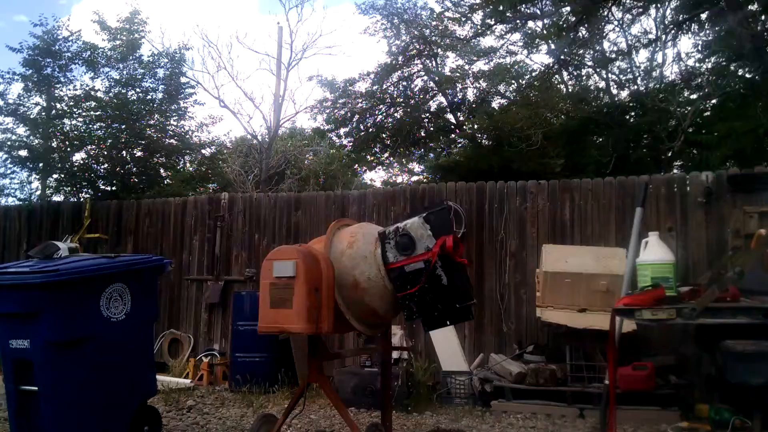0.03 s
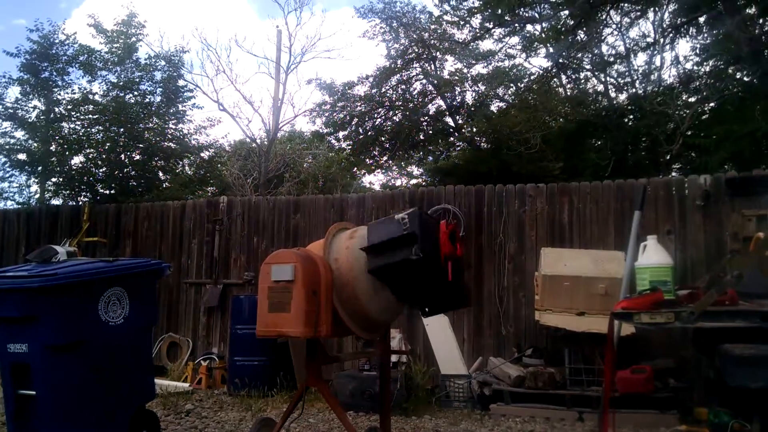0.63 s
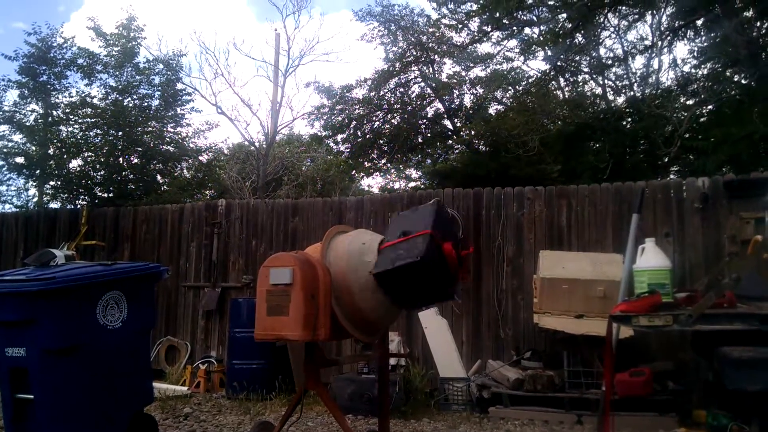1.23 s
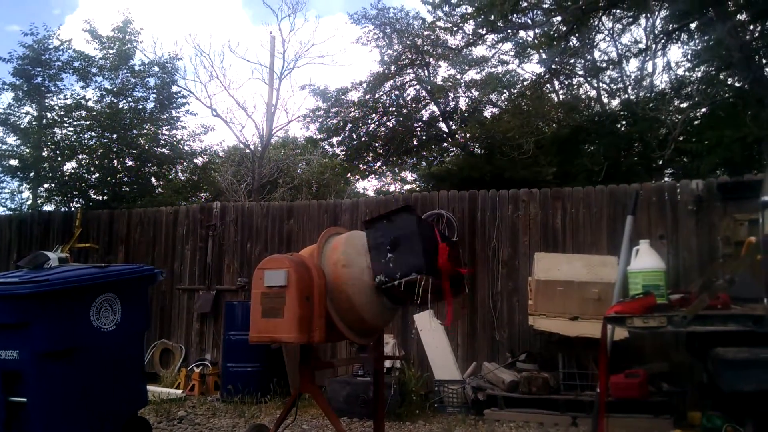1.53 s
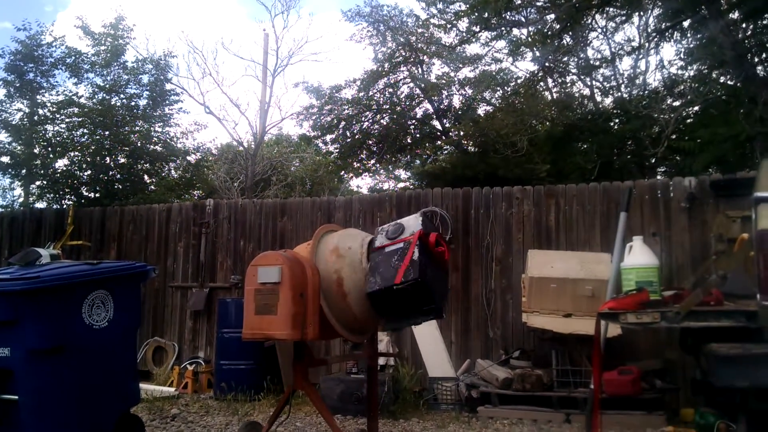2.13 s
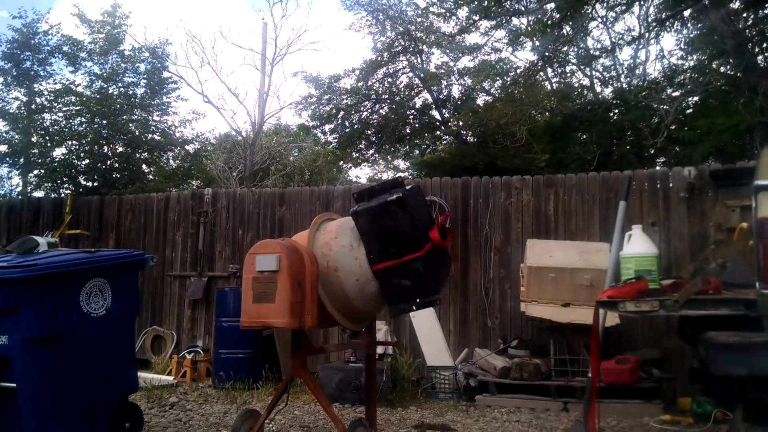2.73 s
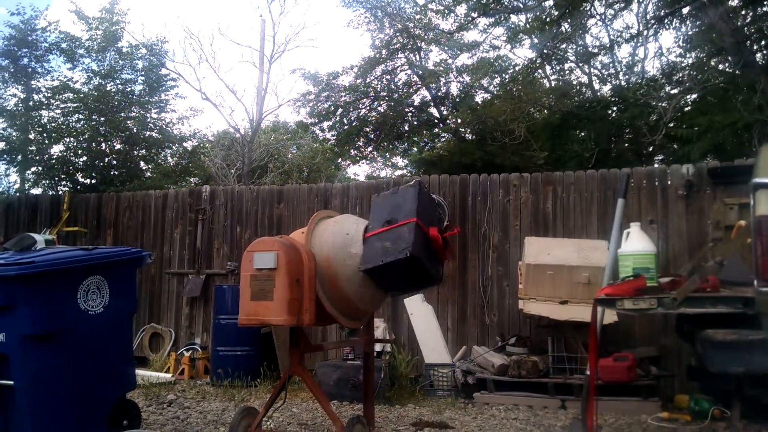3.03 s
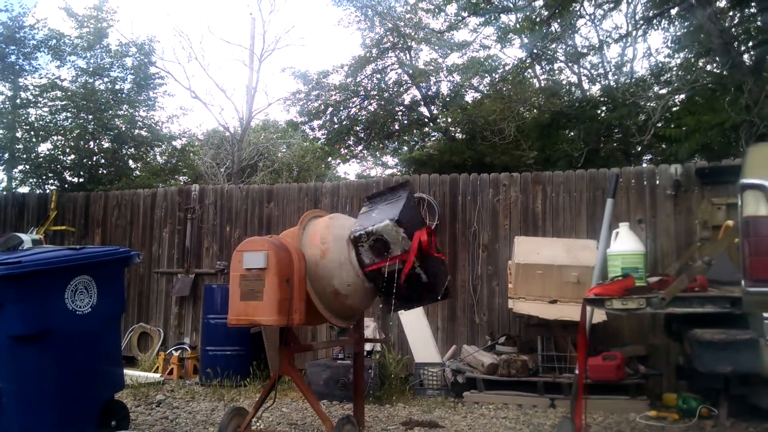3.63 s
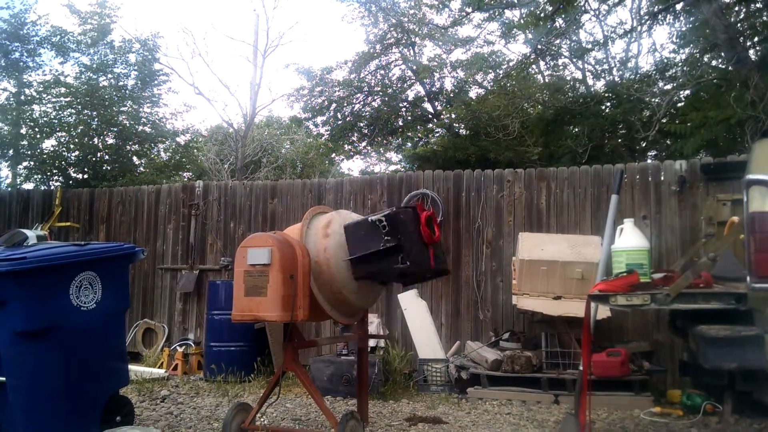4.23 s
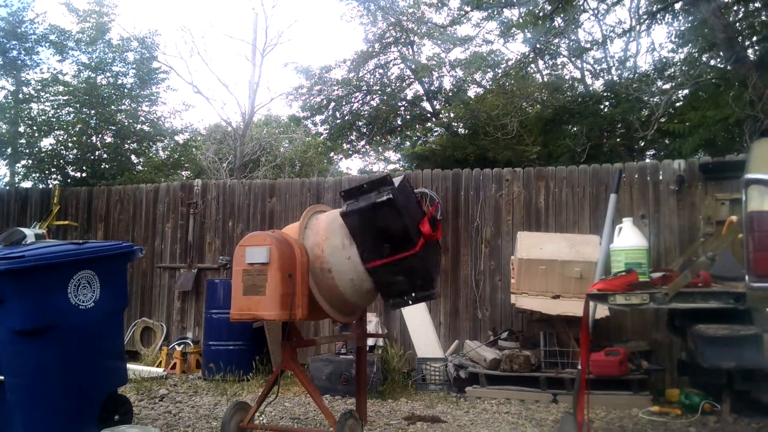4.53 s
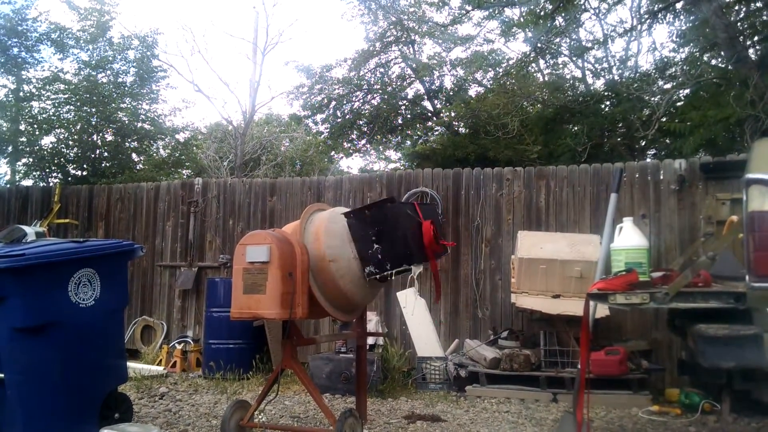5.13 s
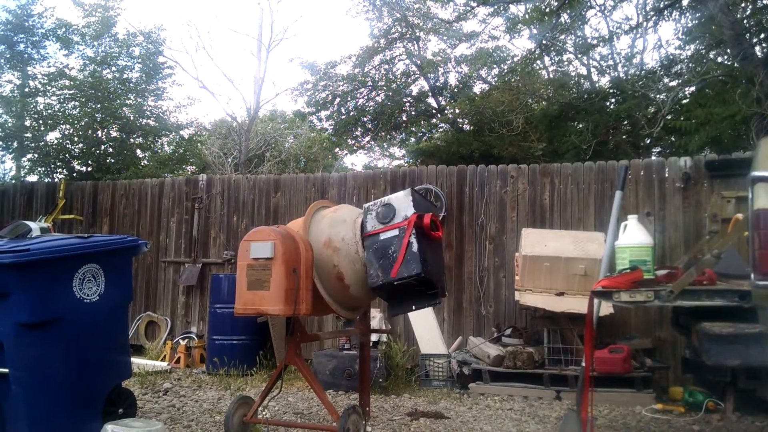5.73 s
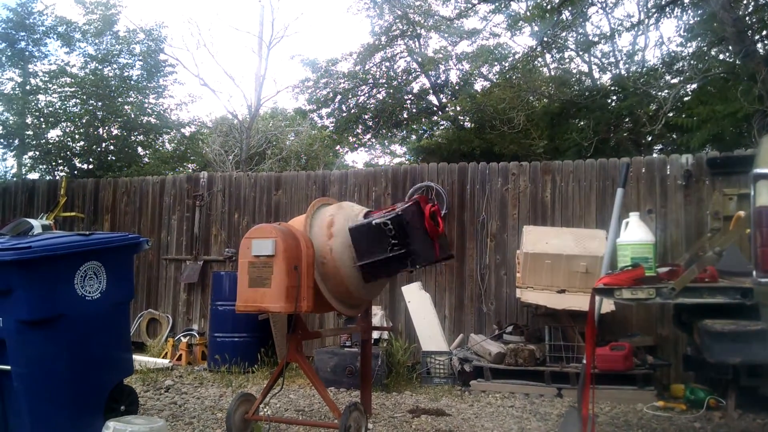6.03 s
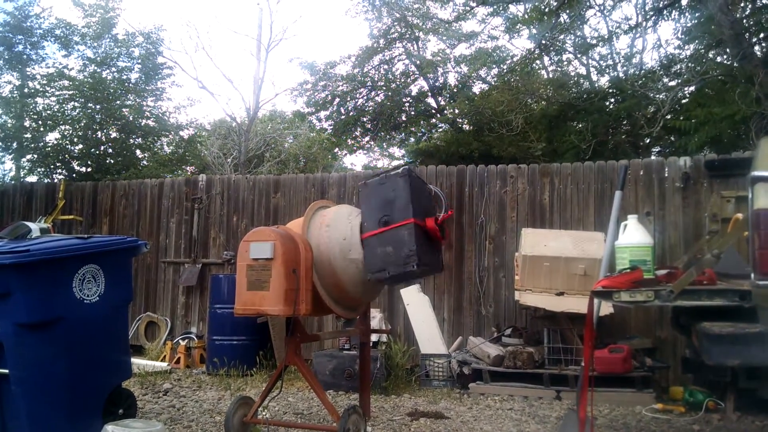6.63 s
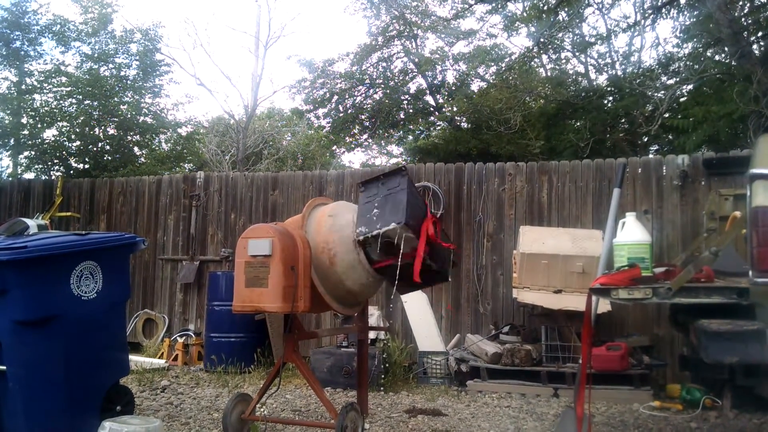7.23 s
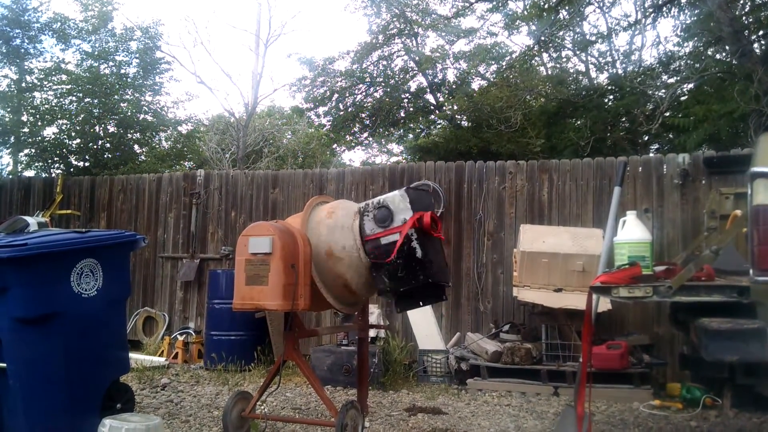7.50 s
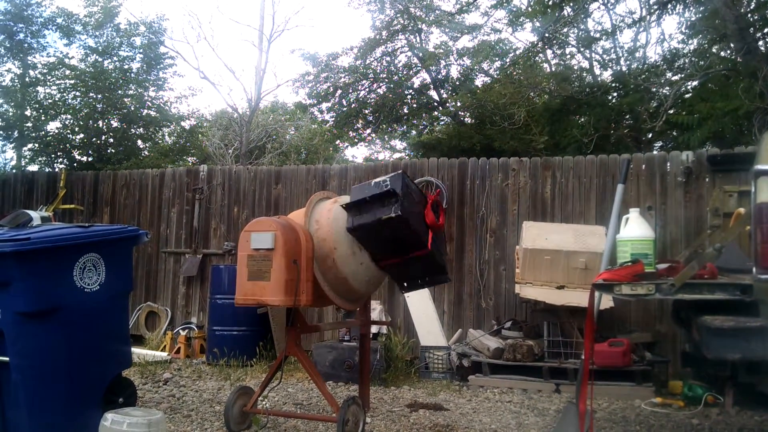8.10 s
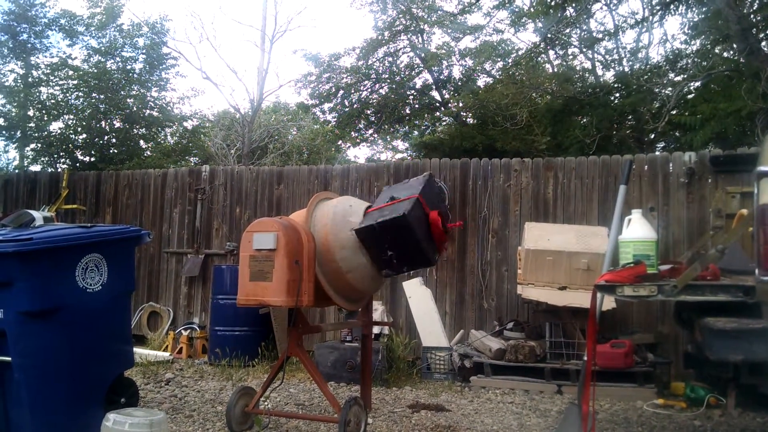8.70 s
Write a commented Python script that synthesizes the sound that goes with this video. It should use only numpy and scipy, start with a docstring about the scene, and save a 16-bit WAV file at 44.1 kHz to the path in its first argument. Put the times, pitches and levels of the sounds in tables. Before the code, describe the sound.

From about 0.3 seconds, loose hard pieces tumble inside a tank turning on a cement mixer. Roughly every 0.9 seconds the load pours across the wall in a bright, sizzling rattle with a gritty scrape, then rolls into a corner and drums hollowly on the tank. The pours come near 1.2, 2.1, 3, 3.9, 5, 5.7, 6.7, 7.6 and 8.6 seconds. Single pieces clink and ping around them, and heavier ones knock and briefly ring the tank. A faint, low motor hum and rumble continue underneath. At about 4.7 seconds one sharp, loud microphone pop ducks everything for about half a second. A hard clack stands out near 5.9 seconds, the drumming grows stronger from about 7.5, and the heaviest knock lands at 8.5. The sound is in stereo, outdoors in a back yard, with a short, faint echo from the fence.

```python
"""Loose hard pieces tumble in a tank strapped to the drum of a cement mixer in a back yard.
Twice a turn the load pours across a wall with a bright rattle, then rolls into a corner and drums
on the tank. Single pieces clink; heavy ones knock and ring the tank. The motor hums underneath
and the fence returns a short echo. A two-port microphone picks it up, with one sharp pop
that ducks its limiter for about half a second."""
import sys
import numpy as np
from scipy import signal
from scipy.fft import rfft, irfft
from scipy.io import wavfile
from scipy.ndimage import uniform_filter1d

SR = 44100
rng = np.random.default_rng(int(sys.argv[2]) if len(sys.argv) > 2 else 0)


def wav_record(signal):
    """Record a signal, one row per channel, as 16-bit PCM in the file named by sys.argv[1]."""
    frames = np.transpose(np.atleast_2d(signal))
    bounded = np.clip(frames, -1, 1)
    # unit amplitude maps onto the largest positive 16-bit level
    quanta = np.round(bounded * 32767).astype(np.int16)
    wavfile.write(sys.argv[1], SR, quanta)


N = 386316
DRUMMING, CLATTER, BOOM = 1, 2, 3  # columns of HEAP_CYCLE and HEAP_ACCENTS


def tumbling(drumming_hz=345, clatter_hz=790, boom_hz=(62, 285), spots=64):
    """The rolling heap drums on the walls; its hard edges clatter and its weight booms the tank."""
    hits = hail(per_s=800, spread_db=1.8, clump_db=1.5, clump_hz=32.8)
    spot = (spots * np.arange(N) / N + 2 * rng.random(N)).astype(int)
    blows = strike(hits, [tank_ring() for _ in range(spots)], spot)
    upper = signal.sosfiltfilt(signal.butter(8, clatter_hz, "high", fs=SR, output="sos"), blows)
    drumming = heap_level(DRUMMING) * steady(band(blows - upper, drumming_hz, "high"))
    clatter = heap_level(CLATTER) * steady(upper)
    boom = heap_level(BOOM) * steady(band(blows, boom_hz, "band"))
    return drumming + clatter + boom


# heap over one turn: time_s, drumming_db, clatter_db, boom_db
HEAP_CYCLE = [(0.05, -39, -40.5, -42.5), (.18, -36, -37, -39.5), (.26, -38, -42, -47.5),
              (.36, -33, -36.5, -41), (.46, -31.5, -33, -39.5), (.55, -33.5, -38, -37),
              (.61, -31, -32, -36.5), (.74, -35, -42.5, -37.5), (.82, -30, -32.5, -35),
              (.89, -28.5, -29, -33.5), (.96, -26.5, -26, -30.5), (1.05, -30.5, -35, -31),
              (1.13, -27.5, -32, -32), (1.19, -28, -32, -30.5), (1.29, -32, -36.5, -36.5),
              (1.38, -27.5, -29, -34), (1.46, -29, -32, -33), (1.6, -26.5, -27.5, -33),
              (1.73, -31.5, -31.5, -35), (1.82, -37, -39.5, -36.5)]
# force of the roll, per turn: offset_db
TURN_OFFSETS = [-1.5, -2.5, -2.5, -3, 0.06]
# brief swells and dips: centre_s, drumming_offset_db, clatter_offset_db, boom_offset_db
HEAP_ACCENTS = [(.92, 3, 2, 5), (1.185, 4, 1, 3), (1.79, 3, 6, 4), (2.79, -2, -0.5, 2),
                (3.221, -1, 5.5, -1), (3.45, 2.5, 2.5, 3), (3.625, 2, 4.5, 1.5), (3.81, 6.5, 5.5, 7),
                (4.025, 2, 4, 4), (4.3, 3, -0.5, 1), (4.465, 6, 0, 1.5), (4.69, 4, 1.5, 1.5),
                (5.045, 2.5, 6, 2), (5.78, 8, 6, -4), (6.275, 4, 5.5, 0), (6.37, 2, 3.5, 3),
                (6.765, 2.5, 6, 1.5), (7.08, 1, 2.5, 0), (7.424, 5.5, 4.5, 5), (7.56, -2, 4, -3),
                (7.65, 9.5, 11, 10), (7.88, 8, 4, 2), (8.035, 2.5, 0, 1), (8.245, 5, 3.5, 8),
                (8.42, 0, 0.5, 1)]

def heap_level(column, turn_s=1.85, accent_half_width_s=0.041):
    """Level of the rolling heap: one cycle a turn, varied by turn and by brief accents."""
    t, cycle = np.arange(0, N, 128) / SR, np.array(HEAP_CYCLE)
    db = np.interp(t, cycle[:, 0], cycle[:, column], period=turn_s)
    db += np.interp(t / turn_s, np.arange(len(TURN_OFFSETS)) + .5, TURN_OFFSETS)
    db += sum(row[column] * np.exp(-((t - row[0]) / accent_half_width_s) ** 2) for row in HEAP_ACCENTS)
    return np.interp(np.arange(N) / SR, t, gain_of(db))


# tank modes: pitch_hz, width_hz, level_db
TANK_MODES = [(72, 7.5, -10), (142.7, 5.6, -8.5), (187.8, 9.3, 0.5), (210.9, 10.6, -0.5), (240.7, 15.2, -3),
              (395.7, 29, -3), (474, 53, -3.5), (554.6, 17.3, 0.5), (601, 28, 7), (645.5, 36, -1),
              (691.7, 20.5, 2), (772, 24, -6.5), (871.4, 26, 4), (927, 30, -4.5), (1027.5, 33, 0),
              (1288, 18, -6), (1392.4, 37, 0), (1453, 53, -5), (1562, 44, -12)]
# dense, fast-dying ring between the modes: freq_hz, level_db
WALL_SPECTRUM = [(30, -53), (100, -24), (180, -0.5), (300, -15.5), (550, 7.5), (950, -1.5), (1200, -5.5),
                 (1500, -5), (2000, -3.5), (2600, -9.5), (4000, -15), (9000, -62.5)]

def tank_ring(wall_db=-2.5, wall_t60_s=0.047, detune=.017, damping_spread=.3, size=6144):
    """One blow: each spot excites the modes differently; the load detunes and damps them."""
    t = np.arange(size) / SR
    hz, width_hz, db = np.transpose(TANK_MODES)[:, :, None]
    weight = rng.choice([-1, 1], (2, len(hz))) * rng.uniform(0.42, 1.8, (2, len(hz)))
    hz = hz * (1 + detune * rng.standard_normal(hz.shape))
    damped_hz = width_hz * np.exp(damping_spread * rng.standard_normal(hz.shape))
    envelopes = gain_of(db) * np.sqrt(width_hz * damped_hz) * np.exp(-np.pi * damped_hz * t)
    modes = weight @ (envelopes * np.sin(2 * np.pi * hz * t))
    wall = colour(burst(decay(wall_t60_s, size)), WALL_SPECTRUM)
    return unit_rms(modes) + gain_of(wall_db) * unit_rms(wall)


# heavy blows: start_s, clack_db, clack_t60_s, ring_db
HEAVY_BLOWS = [(0.603, -23, .02, -28), (0.886, -19, .04, -17), (1.365, -24, .04, -12),
               (1.595, -23, 0.036, -15), (1.946, -23, 0.051, -27), (2.241, -23, .03, -21),
               (2.645, -26, 0.022, -27), (2.809, -23, .03, -22), (3.431, -20, .03, -23),
               (3.468, -18, .03, -20), (3.624, -19, .02, -25), (3.763, -24, .03, -24),
               (3.869, -12, .018, -22), (4.117, -19, .04, -17.5), (4.463, -36, .04, -19),
               (4.662, -18, .03, -21), (5.870, -4.5, 0.024, -19), (6.333, -22, .04, -19.5),
               (6.412, -19, .03, -20), (7.098, -18, 0.021, -24), (7.523, -22, 0.026, -27),
               (7.848, -17, .04, -14), (8.008, -16, 0.021, -20.5), (8.205, -22, .04, -17),
               (8.235, -9.5, 0.044, -16), (8.512, 0, .06, -8)]
# hard contact on a wall: freq_hz, level_db
CLACK_SPECTRUM = [(60, -17), (250, -10), (420, 5.5), (600, 5.5), (900, 4), (1150, 1), (1400, 4.5),
                  (1620, 0), (1850, -11), (2300, -14), (3500, -12), (8000, -34)]

def knocking(ring_trim_db=-1):
    """Heavy pieces strike a wall with a hollow clack and ring the tank."""
    out = np.zeros((2, N))
    for start_s, clack_db, t60_s, ring_db in HEAVY_BLOWS:
        clack, ring = colour(burst(decay(t60_s)), CLACK_SPECTRUM), tank_ring()
        add(out, start_s, gain_of(clack_db) * clack / abs(clack).max(1, keepdims=True))
        add(out, start_s, gain_of(ring_db + ring_trim_db) * ring / abs(ring).max())
    return out


# pieces scraping the wall: freq_hz, level_db
SCRAPE_SPECTRUM = [(200, -35), (900, 2), (1500, -1.5), (1900, -9), (2400, -11), (2800, -2), (3300, 2.5),
                   (4000, -1), (4700, -5.5), (5500, -4), (6600, -5), (7800, -2.5), (12000, -4.5)]

def sliding(flow, grinding, rattle_db=1.5, scrape_db=2.0, count=48):
    """Pieces pour over each other in bright ticks and scrape along the wall."""
    hits = hail(per_s=1000, spread_db=3.2, clump_db=2.4, clump_hz=50)
    pieces = [tick(t60_s=.012, uneven_db=5.5, crack_db=-2) for _ in range(count)]
    ticks = steady(strike(hits, pieces, rng.integers(0, count, N)), size=3000)
    rattle = rattling(gain_of(rattle_db) * flow * ticks, flow)
    drags = hail(per_s=1500, spread_db=3.0, clump_db=3.0, clump_hz=40)
    scrape = colour(burst(scrape_envelope(hits + drags)), SCRAPE_SPECTRUM)
    return rattle + gain_of(scrape_db) * grinding * scrape


def scrape_envelope(hits, t60_s=0.017, tail_db=-4, tail_t60_s=0.09):
    """Each contact is a short crack with a tail of reflections; their powers add."""
    contact = decay(t60_s) + gain_of(tail_db) * decay(tail_t60_s)
    return steady(np.sqrt(abs(signal.oaconvolve(hits ** 2, contact ** 2)[:N])))


# pours, two a turn: start_s, hold_s, head_start_s, rattle_db, straggler_db, bulk_db
LOAD_POURS = [(0.173, 0.22, 0, -24, -28.5, -27.5), (1.17, 0.22, 0.085, -19, -43, -36),
              (2.11, .14, 0.16, -22, -27, -26.5), (3.042, 0.18, 0.14, -20.5, -41, -30.5),
              (3.9, .16, 0.062, -20, -27, -24), (4.98, 0.097, 0.2, -18.5, -48, -29),
              (5.74, 0.19, 0.13, -20, -28, -30), (6.721, 0.18, 0.12, -19.5, -53, -32.5),
              (7.64, 0.094, 0.12, -19.5, -23.5, -22), (8.555, 0.18, 0.094, -19.5, -21, -26)]

def pour_levels(rise_db_per_s=230, fall_db_per_s=130, shaken_db=-20, restless_db=-56.5):
    """Levels of the flow, the trickle around each pour, and the grinding as the bulk arrives."""
    pours, ahead, behind, bulk = [], [], [], []
    for start_s, hold_s, early_s, rattle_db, straggler_db, bulk_db in LOAD_POURS:
        end_s = start_s + hold_s
        pours.append(swell(rattle_db, start_s, hold_s, rise_db_per_s, fall_db_per_s))
        ahead.append(swell(rattle_db - 15, start_s - early_s, early_s, 116, fall_db_per_s))
        behind.append(swell(straggler_db, end_s, 0, rise_db_per_s, fall_db_per_s=31))
        bulk.append(swell(bulk_db, end_s, 0, rise_db_per_s=94, fall_db_per_s=80))
    shaken = gain_of(shaken_db) * heap_level(DRUMMING)
    trickle = power_sum(*ahead, *behind, shaken, gain_of(restless_db))
    flow = power_sum(*pours, gain_of(-2) * trickle)
    grinding = power_sum(*bulk, gain_of(-11) * flow, gain_of(-11.5) * heap_level(CLATTER))
    return flow, trickle, grinding


# piece against piece: freq_hz, level_db
RATTLE_SPECTRUM = [(200, -7), (1500, -46.5), (3500, 1.5), (5000, -5), (6500, 0), (8000, 2), (9400, 0.5),
                   (10500, 3), (11800, 2.5), (13200, 11.5), (15400, -2.5), (16200, 4)]
# fizz of the finest pieces: freq_hz, level_db
SIZZLE_SPECTRUM = [(3000, -19), (7000, -24.5), (9400, -3.5), (10500, -1), (11800, -3.5), (13000, 6),
                   (15400, 5), (16200, 0)]

def rattling(ticks, flow, equal_mix_db=-31, growth=0.84):
    """Hard pieces touch: the faster the flow, the more of the sound is fine sizzle."""
    ratio = (flow / gain_of(equal_mix_db)) ** growth
    return (colour(ticks, RATTLE_SPECTRUM) + ratio * colour(ticks, SIZZLE_SPECTRUM)) / (1 + ratio)


def tick(t60_s, uneven_db, crack_db=-8, crack_t60_s=0.0018, fence_s=0.01, fence_db=-6.5):
    """One piece lands: a crack, a short ring in its own colour, and the return from the fence."""
    contact = decay(t60_s) + gain_of(crack_db) * decay(crack_t60_s)
    add(contact, fence_s, gain_of(fence_db) * decay(t60_s))
    hz = np.geomspace(2000, 16000, 14)
    spectrum = np.column_stack([hz, uneven_db * rng.standard_normal(len(hz))])
    return colour(burst(contact), spectrum)


# falling pieces: start_s, level_db, t60_s
SINGLE_FALLS = [(.408, -12, 0.018), (0.5356, -20, 0.048), (.554, -18, 0.024), (.601, -22, .02),
                (0.6110, -20, 0.037), (.634, -23, 0.022), (0.6688, -14.5, 0.024), (.733, -32, .02),
                (0.771, -17, 0.036), (.881, -27, .02), (.915, -27, .02), (.950, -27, 0.018),
                (1.0177, -26, .025), (1.057, -25, .02), (1.0916, -13, 0.042), (1.2034, -15, 0.03),
                (1.2322, -15, .014), (1.2784, -17, 0.029), (1.335, -8.5, 0.016), (1.391, -21, .02),
                (1.487, -19, 0.024), (1.704, -36, 0.018), (1.722, -29, 0.016), (1.739, -31, 0.018),
                (1.9023, -25.5, 0.038), (1.9480, -19.5, 0.045), (2.006, -16, 0.038), (2.032, -12, .03),
                (2.0813, -5.5, 0.011), (2.1070, -13, 0.025), (2.1483, -10.5, .03), (2.174, -12.5, .02),
                (2.1967, -13, .02), (2.236, -12, .025), (2.479, -22.5, 0.022), (2.546, -19, 0.018),
                (2.572, -23, 0.027), (2.6086, -22, 0.054), (2.6446, -21.5, 0.023), (2.6840, -18, 0.034),
                (2.7329, -26, 0.042), (2.7876, -20, 0.017), (2.9108, -24.5, 0.08), (3, -9, .022),
                (3.056, -15, .02), (3.0806, -9, .016), (3.133, -11, 0.0093), (3.8190, -32, .05),
                (3.857, -21, 0.072), (3.8915, -15, .03), (3.906, -6, 0.024), (3.990, -12, .02),
                (4.058, -12, 0.018), (4.246, -17, 0.028), (4.269, -18, 0.022), (4.3565, -24, 0.028),
                (4.3955, -25, 0.025), (4.4219, -30, 0.026), (4.4500, -20, 0.061), (4.4836, -17.5, 0.028),
                (4.506, -22, 0.023), (4.5655, -26, 0.019), (4.621, -32, .02), (4.656, -30, 0.018),
                (4.7472, -19, 0.022), (4.7793, -15, 0.037), (4.8808, -16, 0.027), (4.9095, -15, .022),
                (4.946, -10.5, 0.018), (4.9883, -15, .025), (5.038, -13, .02), (5.197, -22, .02),
                (5.6660, -17, 0.035), (5.713, -10.5, 0.044), (5.7934, -12, .016), (5.8145, -10.5, 0.033),
                (5.9025, -7.5, 0.024), (6.1382, -19, 0.043), (6.164, -20.5, 0.018), (6.202, -20, .02),
                (6.2372, -18, 0.035), (6.2743, -19, 0.026), (6.3345, -24, 0.027), (6.3819, -19.5, 0.015),
                (6.514, -20, 0.037), (6.5742, -17, 0.05), (6.6454, -20.5, 0.036), (6.784, -10, .025),
                (6.8096, -11, 0.023), (7.4523, -29, .04), (7.5234, -16, 0.044), (7.5425, -11, 0.032),
                (7.5893, -10.5, 0.02), (7.6259, -7.5, 0.061), (7.6729, -8, .016), (7.7246, -7.5, .04),
                (7.9825, -20, 0.029), (8.010, -21, .02), (8.0446, -14, 0.042), (8.062, -26, .02),
                (8.125, -14, 0.019), (8.179, -27, .02), (8.235, -12, 0.04), (8.3036, -19, 0.028),
                (8.453, -8, 0.038), (8.473, -16, 0.027), (8.512, -11.5, 0.04), (8.561, -14, .03),
                (8.6058, -11, 0.012)]

def clinking(flow, trim_db=1.5, scrape_db=-11):
    """Single pieces fall clear of the heap."""
    contacts = np.zeros((2, N))
    for start_s, level_db, t60_s in SINGLE_FALLS:
        add(contacts, start_s, gain_of(level_db + trim_db) * tick(t60_s, uneven_db=1.5))
    return rattling(contacts, flow) + gain_of(scrape_db) * colour(contacts, SCRAPE_SPECTRUM)


def pinging(grinding, gain_db=-7.5, t60_s=.045, low_hz=1600, high_hz=9000, count=90):
    """Larger pieces in the sliding heap ring briefly, each at its own pitch."""
    hits = hail(per_s=400, spread_db=1.5, clump_db=7.0, clump_hz=29.5)
    pitches_hz = low_hz * (high_hz / low_hz) ** rng.random(count)
    t, pings = np.arange(2048) / SR, np.zeros((2, N))
    for at in np.flatnonzero(hits):
        hz, phase = rng.choice(pitches_hz), rng.random((2, 1))
        add(pings, at / SR, hits[at] * decay(t60_s, len(t)) * np.sin(2 * np.pi * (hz * t + phase)))
    return gain_of(gain_db) * grinding * steady(pings)


def straggling(flow, trickle, gain_db=3.5, count=16):
    """The larger of the loose pieces drop one by one."""
    hits = gain_of(gain_db) * trickle * hail(per_s=50, spread_db=1.4, clump_db=1, clump_hz=10)
    pieces = [tick(t60_s=.026, uneven_db=4) for _ in range(count)]
    return rattling(strike(hits, pieces, rng.integers(0, count, N)), flow)


# motor hum: shaft_order, level_db
HUM_ORDERS = [(2, -25), (4, 2), (5, 3), (6, 7), (7, -20), (8, 3), (9, -31)]
# drum on its frame: freq_hz, level_db
RUMBLE_SPECTRUM = [(15, -23), (35, -3), (50, -6.5), (70, 1), (84, -11), (100, -11), (300, -11.5),
                   (2000, -69)]

def motor(shaft_hz=29.82, waver=0.0073, throb_db=1.5, hum_db=-58, rumble_db=-52):
    """Shaft orders waver under the shifting load, over the rumble of the drum."""
    turns = np.cumsum(shaft_hz * (1 + waver * drift(4.85))) / SR
    hum = np.zeros(N)
    for order, level_db in HUM_ORDERS:
        level = gain_of(level_db - throb_db * drift(14))
        hum += level * np.sin(2 * np.pi * (order * turns + rng.random()))
    rumble = colour(burst(np.ones(N)), RUMBLE_SPECTRUM, size=8192)
    return gain_of(hum_db) * hum + gain_of(rumble_db) * rumble


def yard(x, echo_db=-18, delay_s=.008, t60_s=0.12, size=12000):
    """The fence and clutter scatter a short, faint tail."""
    tail = burst(decay(t60_s, size) * (np.arange(size) > delay_s * SR))
    return x + gain_of(echo_db) * signal.oaconvolve(x, tail / np.linalg.norm(tail[0]), axes=1)[:, :N]


# likeness of the ports: freq_hz, coherence
PORT_COHERENCE = [(30, .7), (100, .55), (180, .98), (260, .97), (320, .8), (400, .97), (1000, .995),
                  (1500, .99), (1930, .3), (2450, .97), (2650, .97), (3050, .58), (3750, .98), (4450, .6),
                  (4950, .97), (5200, .97), (5900, .5), (7700, .82), (8400, .55), (10300, .94), (11000, .8),
                  (12000, .8), (12800, .96), (15000, .93)]
# port balance: freq_hz, left_minus_right_db
PORT_BALANCE = [(30, -7.5), (100, -5), (320, -5), (600, -2), (900, 1), (1450, 0), (1900, 6), (2450, -0.5),
                (3200, -4.5), (3900, 1), (5500, -2.5), (8000, -3.5), (10500, -1), (14000, -1.5)]
# port phase below ANTIPHASE_HZ: freq_hz, left_lead_rad
PORT_PHASE = [(20, 3.1), (45, 3), (65, .5), (130, .35), (650, .33), (1100, 0), (1800, 0), (2080, -2.3),
              (2560, -3.14)]
ANTIPHASE_HZ = 2565

def ports(x):
    """Two spaced microphone ports: alike in the mids, a lag apart in the treble, partly diffuse."""
    hz = np.fft.rfftfreq(N, 1 / SR)
    lag_rad = 2 * np.pi * (hz / ANTIPHASE_HZ - .5)
    ripple_rad = np.sin(lag_rad) * np.clip(1 - hz / 13000, 0, 1)
    lead_rad = np.where(hz < ANTIPHASE_HZ, lookup(PORT_PHASE, hz), ripple_rad - lag_rad)
    coherence = np.clip(lookup(PORT_COHERENCE, hz), 0, 1)
    tilt = gain_of(lookup(PORT_BALANCE, hz) / 2)
    direct, scattered = rfft(x)
    left = (coherence * direct + np.sqrt(1 - coherence ** 2) * scattered) * np.exp(1j * lead_rad)
    return irfft(np.array([left * tilt, direct / tilt]), N)


# microphone bumps, one sharp, one soft: start_s, gain_db, rise_s, decay_s
MIC_BUMPS = [(4.7177, 10.5, 0.00051, 0.0022), (5.422, -30, .003, 0.0027)]

def pops(highpass_hz=12):
    """Bumps give one-sided pulses with a slow undershoot, opposed in the two channels."""
    t, out = np.arange(SR // 5) / SR, np.zeros((2, N))
    for start_s, gain_db, rise_s, decay_s in MIC_BUMPS:
        pulse = gain_of(gain_db) * (1 - np.exp(-t / rise_s)) * np.exp(-t / decay_s)
        pulse = signal.lfilter(*signal.butter(1, highpass_hz, "high", fs=SR), pulse)
        add(out[0], start_s + 1 / ANTIPHASE_HZ, pulse)
        add(out[1], start_s, -pulse)
    return out


def hail(per_s, spread_db, clump_db, clump_hz):
    """Random impacts of uneven size, louder in clumps."""
    size_db = spread_db * np.minimum(rng.exponential(1, N), 4) + clump_db * drift(clump_hz)
    return gain_of(size_db) * rng.choice([-1, 1], N) * (rng.random(N) < per_s / SR)


def strike(hits, sounds, which):
    """Each impact plays one of the sounds."""
    out = np.zeros((2, N))
    for at in np.flatnonzero(hits):
        add(out, at / SR, hits[at] * sounds[which[at] % len(sounds)])
    return out


def swell(level_db, start_s, hold_s, rise_db_per_s, fall_db_per_s):
    """Attack, hold, release; reaches level_db at start_s."""
    t = np.arange(0, N, 128) / SR
    rise_db = rise_db_per_s * np.minimum(t - start_s, 0)
    fall_db = fall_db_per_s * np.maximum(t - start_s - hold_s, 0)
    return np.interp(np.arange(N) / SR, t, gain_of(level_db + rise_db - fall_db))


def decay(t60_s, size=4096):
    """Falls 60 dB in t60_s, 2 ms at the shortest."""
    return gain_of(-60 * np.arange(size) / SR / max(t60_s, .002))


def burst(envelope):
    """Enveloped noise in two rows: direct, scattered."""
    return envelope * rng.standard_normal((2, len(envelope)))


def drift(rate_hz):
    """Slow noise, rms 1."""
    hz = np.fft.rfftfreq(N, 1 / SR)
    return unit_rms(irfft(rfft(rng.standard_normal(N)) / (1 + (hz / rate_hz) ** 4), N))


def colour(x, spectrum, size=2048):
    """Minimum-phase filter of unit energy."""
    log_gain = np.log(gain_of(lookup(spectrum, abs(np.fft.fftfreq(size, 1 / SR)))))
    taps = np.fft.ifft(np.exp(np.conj(signal.hilbert(log_gain)))).real
    return signal.oaconvolve(x, taps[None] / np.linalg.norm(taps), axes=1)[:, :x.shape[1]]


def band(x, edge_hz, kind):
    """Causal Butterworth filter."""
    return signal.sosfilt(signal.butter(4, edge_hz, kind, fs=SR, output="sos"), x)


def steady(x, size=4000):
    """Holds the running rms near 1."""
    power = uniform_filter1d(uniform_filter1d(x ** 2, size), size // 2)
    return x / np.sqrt(np.maximum(power, 1e-4 * power.mean()))


def lookup(table, hz):
    """Interpolates on a log-frequency axis."""
    table_hz, value = np.transpose(table)
    return np.interp(np.log(hz + 1), np.log(table_hz + 1), value)


def add(mix, start_s, sound):
    part = mix[..., round(start_s * SR):][..., :sound.shape[-1]]
    part += sound[..., :part.shape[-1]]


def power_sum(*levels):
    return np.sqrt(sum(level ** 2 for level in levels))


def unit_rms(x):
    return x / np.sqrt(np.mean(x ** 2) + 1e-20)


def gain_of(db):
    return 10 ** (np.asarray(db) / 20)


def ducking(level_db, limit_db, depth, recover_db_per_s):
    """Gain reduction in dB: jumps with each peak over the limit, recovers at a steady rate."""
    recovered_db = recover_db_per_s * np.arange(N) / SR
    demand_db = depth * np.maximum(level_db - limit_db, 0)
    return np.maximum.accumulate(demand_db + recovered_db) - recovered_db


def scene():
    """Load and motor in the yard, at the microphone."""
    flow, trickle, grinding = pour_levels()
    load = tumbling() + sliding(flow, grinding) + pinging(grinding)
    load += straggling(flow, trickle) + clinking(flow) + knocking()
    return ports(yard(load + motor())) + pops()


def record(dry, treble_sense_db=-3, lag_samples=56, switch_on_s=.306, lowpass_hz=15650):
    """Slightly late, treble-sensitive limiter, then clipping, switch-on and band limit."""
    lag = [1 / lag_samples], [1, 1 / lag_samples - 1]
    power = dry ** 2 + (gain_of(treble_sense_db) * np.diff(dry, prepend=0)) ** 2
    level_db = 10 * np.log10(signal.lfilter(*lag, power.mean(0)) + 1e-12)
    quick_db = ducking(level_db, limit_db=-15.5, depth=0.5, recover_db_per_s=191)
    slow_db = ducking(level_db, limit_db=-7.5, depth=1.27, recover_db_per_s=17.5)
    reduction_db = signal.lfilter(*lag, np.maximum(quick_db, slow_db))
    clipped = np.clip(dry * gain_of(-reduction_db), -1, 1)
    switched_on = np.arange(N) / SR > switch_on_s
    lowpass = signal.firwin(255, lowpass_hz, window=("kaiser", 9), fs=SR)
    return signal.oaconvolve(clipped * switched_on, lowpass[None], "same")


dry = scene()
out = record(dry)
wav_record(out)
```